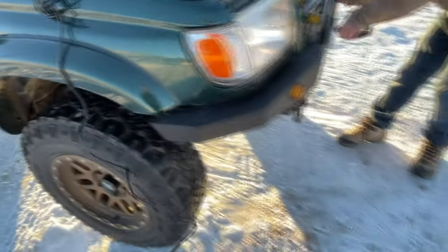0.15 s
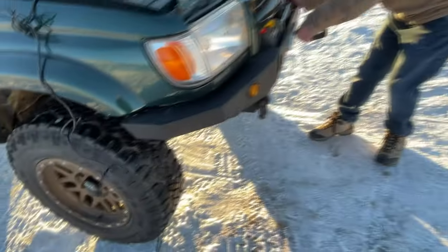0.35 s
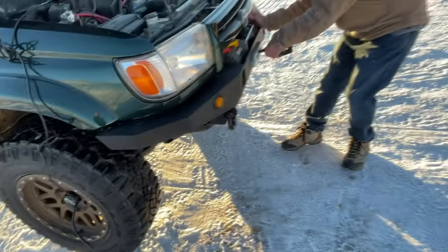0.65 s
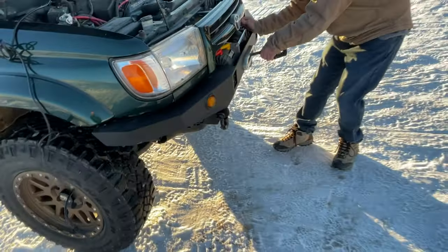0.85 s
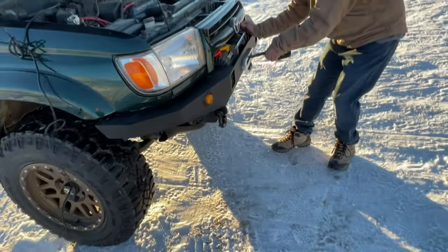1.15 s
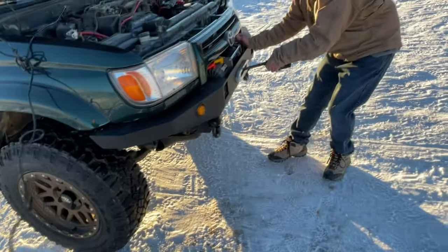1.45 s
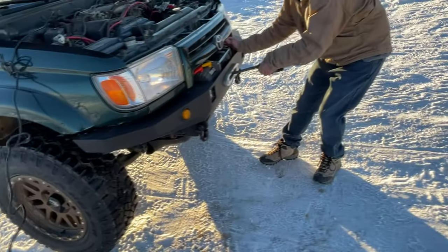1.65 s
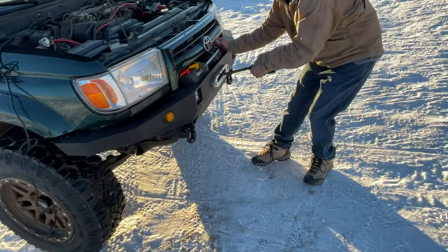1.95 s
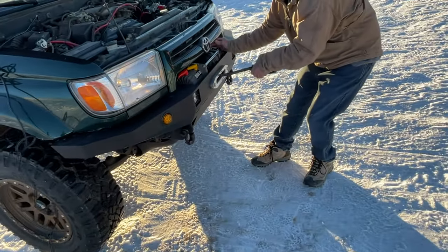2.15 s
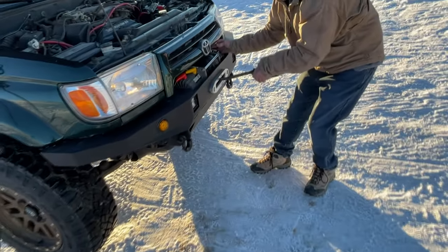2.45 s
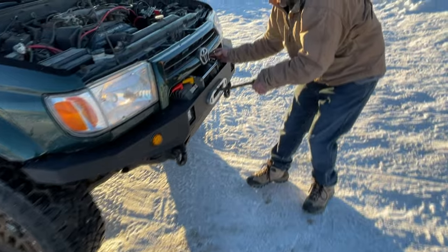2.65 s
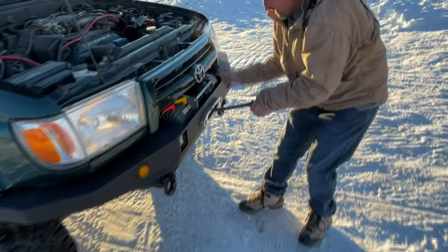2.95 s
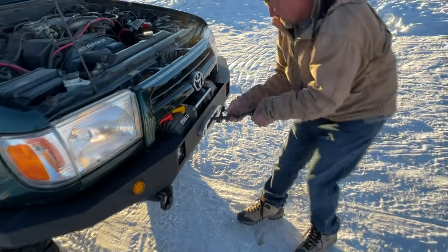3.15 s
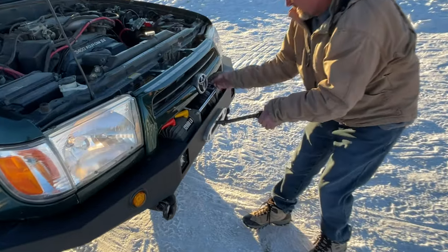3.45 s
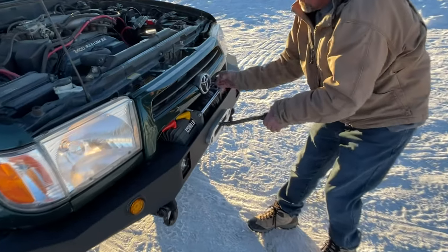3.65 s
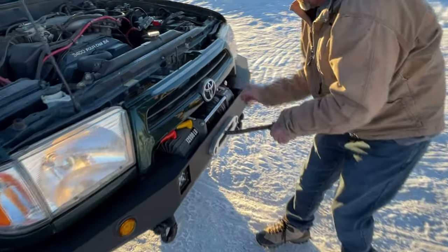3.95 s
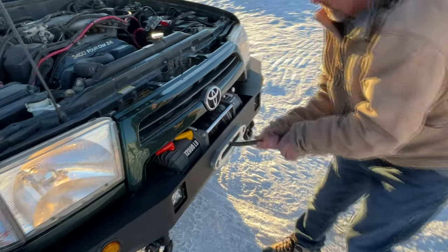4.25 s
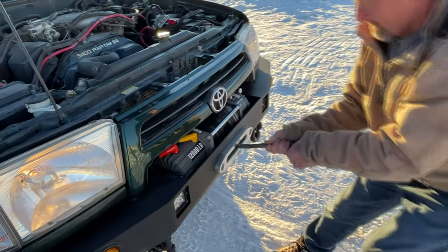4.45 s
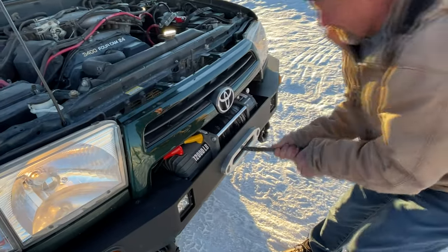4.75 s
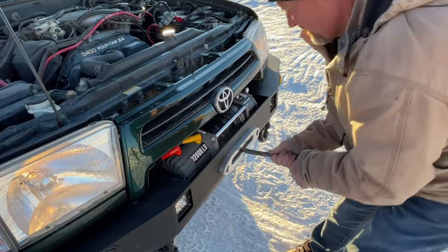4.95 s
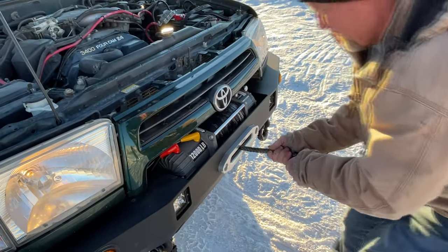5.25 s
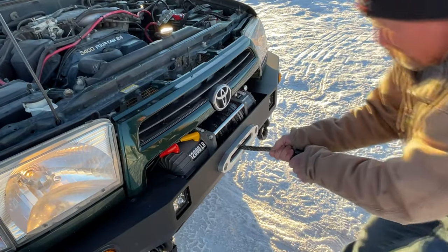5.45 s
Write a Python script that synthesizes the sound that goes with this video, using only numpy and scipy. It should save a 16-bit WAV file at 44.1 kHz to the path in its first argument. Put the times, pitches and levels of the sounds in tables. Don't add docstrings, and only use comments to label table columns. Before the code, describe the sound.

A remote clicks, a relay thunks, and an electric winch whines and growls for over a second, coasting down over an idling engine with metal clinks.

```python
import sys
import numpy as np
from scipy import signal
from scipy.fft import rfft, irfft
from scipy.io import wavfile
from scipy.ndimage import uniform_filter1d

SR = 44100
rng = np.random.default_rng(int(sys.argv[2]) if len(sys.argv) > 2 else 0)


def generate_wav(signal):
    frames = np.transpose(np.atleast_2d(signal))
    scaled = np.clip(frames, -1, 1) * 32767
    pcm = np.round(scaled).astype(np.int16)
    wavfile.write(sys.argv[1], SR, pcm)


def undo_db(level):
    steps = np.asarray(level, float) / 20
    return 10 ** steps


N = 246519
TIME = np.arange(N) / SR

ON_S, OFF_S = .225, 1.61
FULL_TURNS = 92.6


def level(x, db):
    return x * undo_db(db) / np.sqrt(np.mean(x ** 2))


def since(s):
    return np.maximum(TIME - s, 0)


def curves(table):
    s, *columns = np.transpose(table)
    return [np.interp(TIME, s, c) for c in columns]


def on_bins(table):
    hz, value = np.transpose(table)
    return np.interp(np.log(np.fft.rfftfreq(N, 1 / SR) + 1), np.log(hz + 1), value)


def colour(x, table):
    return level(irfft(rfft(x) * undo_db(on_bins(table)), N), 0)


def band(x, hz, width):
    return signal.lfilter(*signal.iirpeak(hz, hz / width, SR), x)


def body(x, modes):
    out = 0
    for k, (hz, width, db) in enumerate(modes):
        out = out + (-1) ** k * undo_db(db) * band(x, hz, width) * np.sqrt(100 / width)
    return out


def walk(rate):
    k = int(SR / rate)
    steps = np.repeat(rng.standard_normal(N // k + 1), k)
    return 1.29 * uniform_filter1d(uniform_filter1d(steps, k), k)[:N]


def rattle(share, spread_db):
    chance = rng.random(N) < share
    return chance * rng.standard_normal(N) * undo_db(spread_db * rng.standard_normal(N))


def winch():
    turns = shaft()
    wobble = 1 + .002 * walk(30) + .005 * walk(200)
    angle = 2 * np.pi * np.cumsum(turns * wobble) / SR
    brake_s, brake_db_per_s = 2.5, 73
    running = np.clip(since(ON_S + 0.017) / 0.016, 0, 1) * undo_db(-brake_db_per_s * since(brake_s))
    tones = motor_tones(turns, angle)
    noises = bumper_growl(turns) + gear_mesh(turns, angle) + brush_hiss(turns, angle)
    return running * (tones + noises)


def shaft():
    quick_share, quick_s, slow_s = .5, .05, .262
    slack_turns, slack_s, coast_turns_per_s = 3.3, .03, 60
    quick = quick_share * np.exp(-since(ON_S) / quick_s)
    slow = (1 - quick_share) * np.exp(-since(ON_S) / slow_s)
    slack = slack_turns * (1 - np.exp(-since(OFF_S) / slack_s))
    return np.maximum(FULL_TURNS * (1 - quick - slow) - slack - coast_turns_per_s * since(OFF_S), 1)


def start_surge():
    return np.exp(-since(ON_S + 0.018) / .035)


def unloaded():
    return 1 - np.exp(-since(OFF_S) / .2)


def drive_db(turns, full_db, loss_db, surge_db, off_db):
    return full_db - loss_db * (FULL_TURNS - turns) + surge_db * start_surge() + off_db * unloaded()


def dullness(turns):
    return np.clip(.018 * (FULL_TURNS - turns) * unloaded(), 0, .9)


def motor_tones(turns, angle):
    # shaft multiple, level/dB
    shaft_orders = [(1, 0), (2, -19.5), (4, -1), (6, -7.5)]
    # shaft multiple, level/dB, once-a-turn throb/0-1, loss/dB per turn a second under full speed
    bar_orders = [(29, 0, .3, -.2), (53, -4, .1, .8), (58, -2, .9, 0), (70, -6, .4, 1.2), (87, -7, .6, 1.2)]
    # f/Hz, level/dB
    shell = [(1400, -3), (1950, 4), (2080, -4), (2200, 3), (2370, -12), (2460, 1), (2500, -7), (2540, 0),
             (2650, -7), (2900, 0), (3850, 3), (4200, -5), (4450, 0), (5350, -1)]
    lack = FULL_TURNS - turns
    hum_db = drive_db(turns, -35.5, 0.9, 0, -14)
    strain_db = 18 * np.minimum(lack, 28) / FULL_TURNS
    whine_db = -49 + strain_db - 40 * start_surge() - 70 * since(OFF_S)
    tones = sum(undo_db(hum_db + db + 1.3 * walk(11)) * np.sin(k * angle) for k, db in shaft_orders)
    for k, db, throb, fade in bar_orders:
        uneven = 1 + throb * (turns / 92) ** 6 * (np.cos(angle) + 0.55 * np.cos(2 * angle + k))
        shell_db = np.interp(k * turns, *np.transpose(shell)) - fade * np.minimum(lack, 30)
        tones = tones + undo_db(whine_db + db + shell_db + 2.2 * walk(40)) * uneven * np.sin(k * angle)
    return np.sqrt(2) * tones


def bumper_growl(turns):
    # f/Hz, width/Hz, level/dB
    bumper = [(291.5, 9.7, -5.5), (326.3, 30, 4.5), (369, 47, 2), (422, 16, 1.5), (450, 46, -1),
              (497.6, 15, -4), (611, 27, -7)]
    # t/s, level/dB
    lurches = [(.455, 5), (.525, 6), (.69, 2.5), (0.609, 4), (.79, 4), (1.23, 5.5), (1.385, 6), (1.48, 6),
               (1.55, 0), (1.64, 1), (2.1, 3)]
    lurch_s, wrap_s, wrap_db = 0.023, 0.54, 5.5
    judder_db = sum(db * np.exp(-((TIME - s) / lurch_s) ** 2) for s, db in lurches)
    rope_db = wrap_db * np.exp(-((TIME - wrap_s) / 0.23) ** 2)
    growl = level(body(rattle(.05, 2) * undo_db(1.5 * walk(35)), bumper), 0)
    growl = growl - .6 * dullness(turns) * band(growl, 460, 200)
    return undo_db(drive_db(turns, -29.5, 0.13, 20.5, 0.5) + judder_db + rope_db) * growl


def gear_mesh(turns, angle):
    # f/Hz, width/Hz, level/dB
    housing = [(807, 120, 1), (1024, 146, 2.5), (1255, 42, -2.5), (1520, 18, -1), (1683, 78, -2),
               (1986, 64, -4), (2158, 37, -7), (2510, 77, -7.5)]
    worn = level(np.diff(np.floor(angle / (2 * np.pi)), prepend=0), -4)
    teeth = level(rattle(.1, 2.1) * (1 + 0.051 * np.cos(angle)), 0) + worn
    mesh = level(body(teeth, housing), 0) + undo_db(-9.0) * level(band(teeth, 1040, 1070), 0)
    mesh = mesh - dullness(turns) * band(mesh, 2450, 1300)
    mesh_db = drive_db(turns, -32, 0.13, 20, -3.5) + 1.66 * walk(14.3)
    squeal_turns, squeal_span = 84, 7.5
    squeal_db = -48 + 14 * np.exp(-((turns - squeal_turns) / squeal_span) ** 2)
    squeal_db = squeal_db - 9 * unloaded() - 8 * since(OFF_S)
    squeal = np.sqrt(2) * level(band(teeth, 1361, 15.0), 0)
    return undo_db(mesh_db) * mesh + undo_db(squeal_db - 5) * squeal


def brush_hiss(turns, angle):
    # f/Hz, level/dB per Hz
    brush = [(1470, -41), (2500, -5.5), (3110, -5.5), (4410, -7.5), (4910, -3.5), (5610, -8), (6500, -1.5),
             (7360, -7), (7950, -4.5), (10400, -18.5), (13800, -21.5), (14700, -32), (16000, -57)]
    hiss = colour(rattle(0.25, 0.94) * (1 + 0.044 * np.cos(angle)), brush) * undo_db(0.41 * walk(27))
    return undo_db(drive_db(turns, -36.5, 0.11, 20.5, -2.5) - 21 * since(OFF_S)) * hiss


def knocks():
    # t/s, peak/dB, centre f/Hz, fall/ms
    taps = [(.2275, -30, 3550, 12), (.2545, -18, 1880, 18.5), (.264, -20.5, 450, 24), (.47, -18, 424, 4.7),
            (.862, -27, 5500, 15), (2.4115, -31, 700, 4.5), (3.053, -35, 3200, 4), (3.062, -34, 600, 20),
            (2.982, -43, 1500, 1.8), (3.812, -37, 6140, 3.4), (3.819, -24, 1960, 5), (3.877, -30, 400, 4),
            (3.925, -40, 1700, 3.3), (4.3105, -30, 1300, 1.6), (5.35, -37.5, 4500, 45)]
    # t/s, peak/dB, centre f/Hz, fall/ms
    pings = [(.2025, -24.5, 6550, 1.7), (.55, -35.5, 3300, 5.4), (.865, -33, 2970, 6),
             (2.597, -43.5, 4670, 12), (5.302, -24.5, 4270, 6.3), (5.303, -26, 6660, 8.4),
             (5.316, -33.5, 2280, 4.5)]
    # t/s, peak/dB, centre f/Hz, fall/ms
    scuffs = [(.2013, -27, 10000, 3), (.245, -26, 1640, 11), (.253, -23, 5660, 7.8), (.452, -23, 390, 5.1),
              (1.605, -37, 8500, 6), (2.37, -47.5, 4300, 34), (2.44, -40, 4560, 11),
              (3.792, -34, 3130, 2.7), (3.832, -26, 1390, 17.4), (3.836, -36, 5030, 5.3),
              (3.838, -25.5, 368, 28), (4.66, -32.5, 350, 5.2), (4.925, -48, 12000, 57),
              (4.93, -45.5, 4000, 29), (5.318, -28, 1750, 15), (5.318, -25, 4840, 13),
              (5.39, -41, 1300, 27), (5.318, -36, 600, 19), (5.312, -40, 12500, 12)]
    # t/s, peak/dB, centre f/Hz, fall/ms
    rings = [
        (.2022, -18.5, 3500, 1.3),
        (1.607, -31, 3700, 5.8),
        (3.055, -27.5, 1800, 3.7),
    ]
    kinds = [(taps, 1.04, 0.093), (pings, 0.31, 0.75), (scuffs, 1, 1.16), (rings, 0.057, 1.2)]
    out, grit = np.zeros(N), rattle(.4, 2)
    strike = 4
    for kind, (rows, wide, steep) in enumerate(kinds):
        for k, (s, db, hz, fall) in enumerate(rows):
            at = slice(int((s - .15) * SR), int((s + .19) * SR))
            late = 1000 * (TIME[at] - s)
            swell = np.where(late < 0, np.exp(-(late / (steep * fall)) ** 2), np.exp(-late / fall))
            contacts = np.roll(grit, 5000 * k + 61000 * kind)[at]
            contacts = contacts + strike * max(1 - steep, 0) * (abs(late) < 500 / SR)
            ring = band(band(contacts, hz, wide * hz), hz, wide * hz)
            out[at] += undo_db(db) * swell * ring / ring.std()
    return out + solenoid_slam() + hook_clink()


def solenoid_slam():
    # t/s, level/dB
    slams = [
        (0.258, 13),
        (0.278, 8),
    ]
    blows = sum(undo_db(db) * np.exp(-((TIME - s) / 0.00052) ** 2) for s, db in slams)
    return band(blows, 300, 5.0)


def hook_clink():
    # f/Hz, width/Hz, level/dB
    hook = [(1035, 15, 3), (1546, 40, 6.5), (1553, 15, 2.5), (1820, 42, -7), (2210, 34, -3), (3200, 35, -5)]
    # t/s, level/dB
    hook_blows = [(3.056, -24.5), (3.8174, -21), (4.313, -32), (5.303, -12), (5.315, -20), (5.326, -27),
                  (5.374, -21), (5.384, -24), (5.394, -21.5)]
    blows = sum(undo_db(db) * np.exp(-((TIME - s) / .00006) ** 2) for s, db in hook_blows)
    return undo_db(15.0) * body(blows, hook)


def engine():
    # t/s, firings of one bank per s
    idle = [(0.0, 17.2), (0.25, 17.1), (0.56, 15.0), (1.1, 15.9), (1.71, 16.1), (2.1, 18.3), (2.21, 18.3),
            (3.03, 17.7), (4.5, 17.85), (5.59, 17.7)]
    # t/s, tailpipe level/dB, open bonnet level/dB
    path = [(0, -41, -40.5), (.58, -41, -35), (1.7, -35, -36.5), (2.2, -36, -41.5), (2.8, -39, -38.5),
            (4.2, -41, -35.5), (5.15, -42, -35.5)]
    rate = curves(idle)[0]
    turn = np.cumsum(rate) / SR
    thump_db, bay_db = curves(path)
    fan_db = bay_db - 10 - 7 * np.maximum(17 - rate, 0)
    noise = undo_db(thump_db) * exhaust(turn) + undo_db(bay_db) * engine_bay(turn) + undo_db(fan_db) * cooling_fan(turn)
    dip_s, dip_ms = 5.164, 7.2
    dip_db = -12 * np.exp(-(1000 * (TIME - dip_s) / dip_ms) ** 2) - 3.5 * (TIME > dip_s)
    return undo_db(dip_db) * noise + steady_whines()


def exhaust(turn):
    harmonics = [(1, -37), (2, -15), (3, -16.5), (4, -1), (5, -6.5), (6, -13), (7, -0.5), (8, -9),
                 (9, -19.5), (10, -31), (11, -26), (12, -31), (13, -7), (14, -16)]
    thump = 0
    for k, db in harmonics:
        thump = thump + undo_db(db + 2 * walk(5.98)) * np.cos(k * (2 * np.pi * turn + 0.1945 * k))
    return level(thump, 0)


def engine_bay(turn):
    # f/Hz, level/dB per Hz
    bay = [(18, -64), (30, -54), (55, -5.5), (123, -2), (151, -10), (268, -2.5), (341, -12), (369, -5.5),
           (399, -15), (572, -16), (959, -15.5), (1320, -19.5), (3500, -31.5), (4550, -42), (7700, -120)]
    # f/Hz, width/Hz, level/dB
    panels = [(578, 11, 4.5), (910.6, 18.4, 10.5), (1189, 6.8, -5.5), (1613, 28, 5.5), (2330, 24, -6.5),
              (3765, 88, -0.5), (4150, 110, -17.5)]
    valves = rattle(.1, 2.2) * (1 + 0.051 * np.cos(2 * np.pi * turn))
    rattling = colour(valves, bay) + undo_db(-10) * level(body(valves, panels), 0)
    return rattling * undo_db(1.07 * walk(12) + 0.66 * walk(40))


def cooling_fan(turn):
    # f/Hz, level/dB per Hz
    fan = [(1470, 1), (2500, -11.5), (2810, -10.5), (5030, -4.5), (5830, -9), (7190, -8.5), (8800, -12),
           (9220, -15.5), (10300, -17), (12300, -11), (16000, -17.5)]
    tick = 1 + 0.52 * np.exp(-(2 * turn % 1) / 0.31)
    return colour(rattle(.3, 0.67) * tick, fan) * undo_db(0.8 * walk(9))


def steady_whines():
    # f/Hz, level/dB
    whines = [(1190, -57), (1610, -60)]
    whine = sum(undo_db(db + 3 * walk(9)) * np.sin(2 * np.pi * hz * TIME) for hz, db in whines)
    return whine * np.clip(TIME - 3.6, .3, 1.4)


def two_ports(mid):
    # f/Hz, phase by which left leads/rad
    port_phase = [(0, 0), (950, 1.7), (2580, 8.8), (3010, 9.1), (4650, 6.2), (5170, 8.7), (5940, 9.9),
                  (6550, 12.1), (6890, 12.2), (7750, 9.4), (8440, 9.6), (10200, 8.8), (12500, 6.5),
                  (16500, 6.1)]
    # f/Hz, left minus right/dB
    port_balance = [(60, 2), (110, 1.5), (200, 6), (380, -1.5), (700, 14.5), (1290, -1.5), (2380, 3),
                    (4400, 7.5), (8120, 0), (15000, -0.5)]
    # f/Hz, share of the difference that is diffuse/0-1
    scatter = [(60, .3), (300, .2), (700, .4), (1500, .55), (4000, .5), (8000, .3), (14000, .4)]
    # f/Hz, side minus mid/dB
    port_side = [(60, -18), (110, -11.5), (200, -13.5), (380, -10), (700, 0.5), (1290, 2), (2380, 1),
                 (4400, -0.5), (7000, -2), (9000, 5.5), (11000, 4), (13000, -11), (16000, -6)]
    # f/Hz, width/Hz, level/dB
    nulls = [(5576, 194, -8.5), (7660, 430, -5.5), (9000, 600, -5.5)]
    cells = signal.stft(mid, nperseg=256)[2]
    scrambled = cells * np.exp(2j * np.pi * rng.random(cells.shape))
    diffuse = signal.istft(scrambled, nperseg=256)[1][:N]
    tilt = np.log(undo_db(on_bins(port_balance) / 2))
    pair = np.tanh(tilt + .5j * on_bins(port_phase) + 1e-9)
    share = np.clip(on_bins(scatter), 0, 1)
    mix = np.sqrt(1 - share) * pair / abs(pair) * rfft(mid) + np.sqrt(2 * share) * rfft(diffuse)
    side = irfft(undo_db(on_bins(port_side)) * mix, N)
    hz = np.fft.rfftfreq(N, 1 / SR)
    null_db = sum(db * np.exp(-((hz - f) / width) ** 2) for f, width, db in nulls)
    mid = irfft(rfft(mid) * undo_db(null_db), N)
    return np.array([mid + side, mid - side])


def scene():
    return two_ports(winch() + knocks() + engine())


def top_cut(x):
    return signal.sosfilt(signal.butter(12, 16850, fs=SR, output="sos"), x)


def record(dry):
    wind_hz, wind_cut, opens_s, open_span_s = 188, .75, 0.59, .3
    bass = signal.sosfiltfilt(signal.butter(2, wind_hz, fs=SR, output="sos"), dry)
    dry = dry - wind_cut * np.clip((opens_s - TIME) / open_span_s, 0, 1) * bass
    dry = signal.sosfilt(signal.butter(2, 45, "high", fs=SR, output="sos"), dry)
    dry = signal.sosfilt(signal.ellip(8, .2, 30, 15750, fs=SR, output="sos"), dry)
    return top_cut(dry)


dry = scene()
out = record(dry)
generate_wav(out)
```